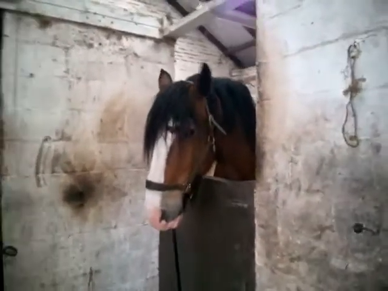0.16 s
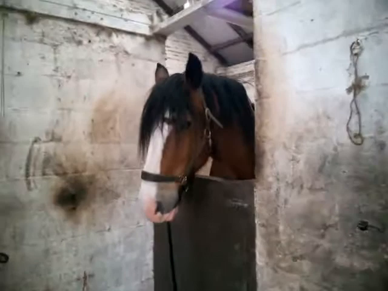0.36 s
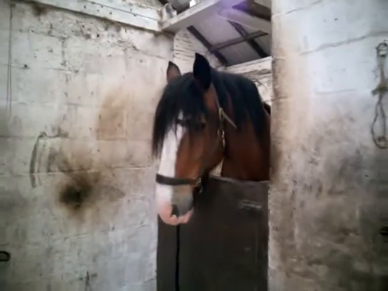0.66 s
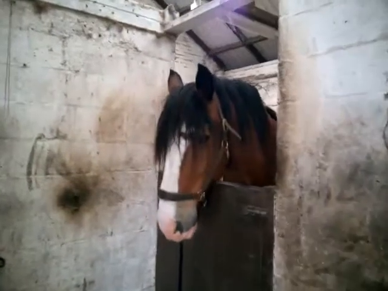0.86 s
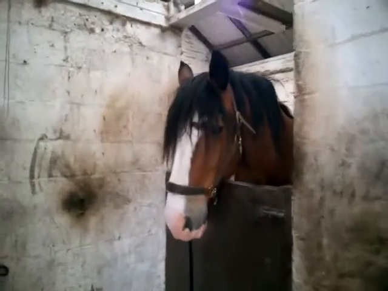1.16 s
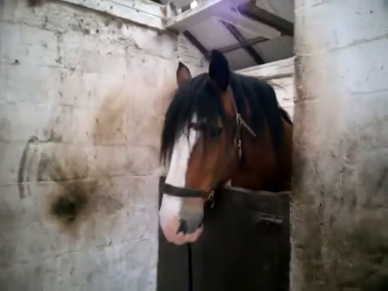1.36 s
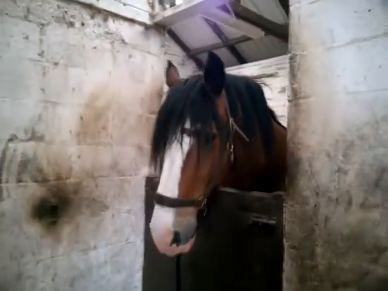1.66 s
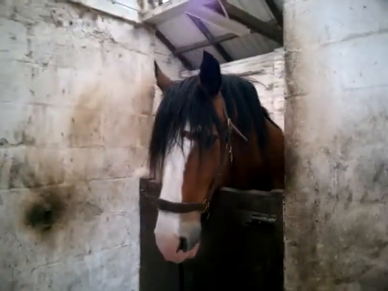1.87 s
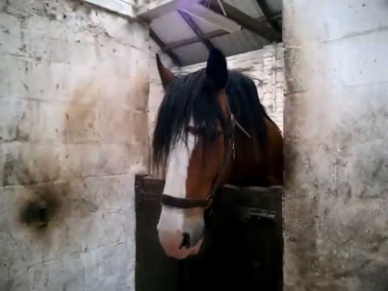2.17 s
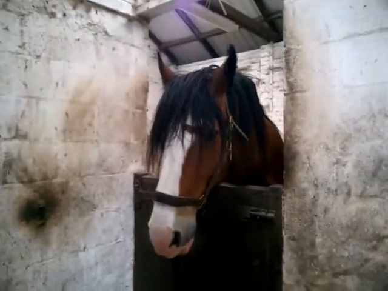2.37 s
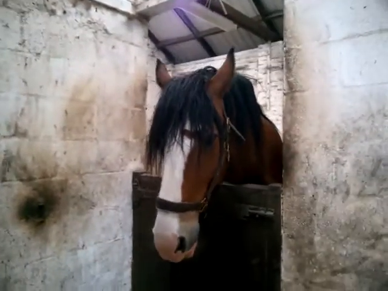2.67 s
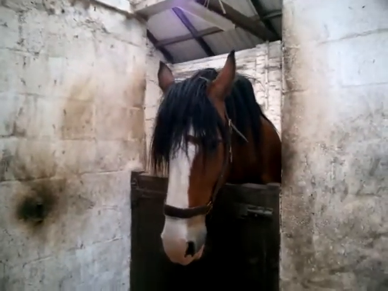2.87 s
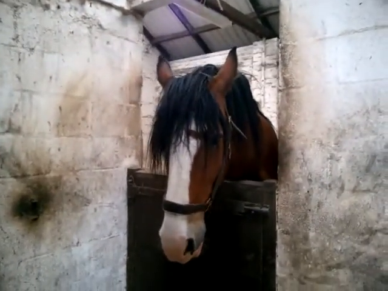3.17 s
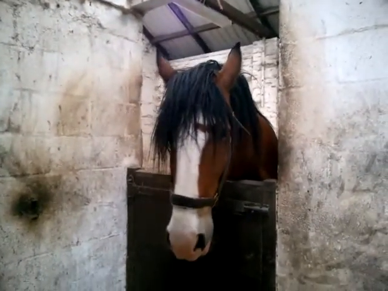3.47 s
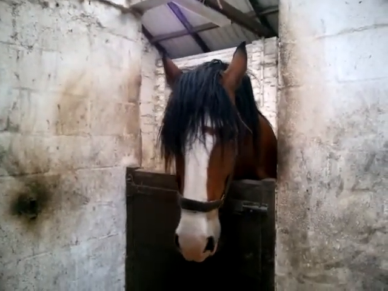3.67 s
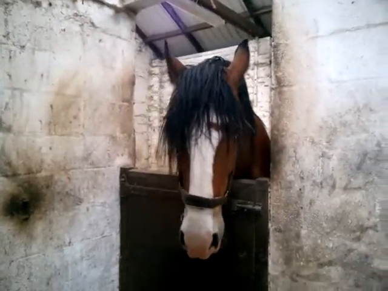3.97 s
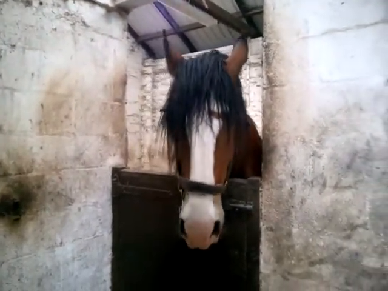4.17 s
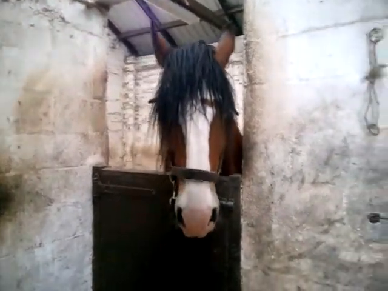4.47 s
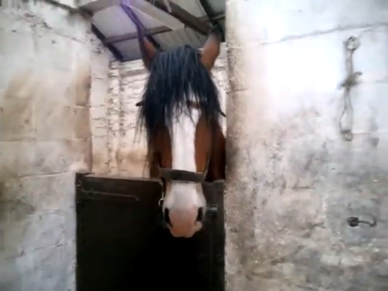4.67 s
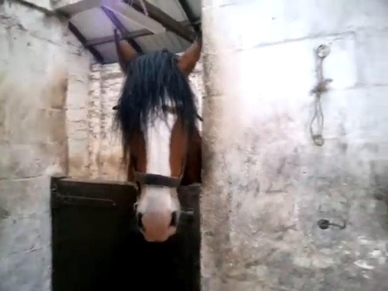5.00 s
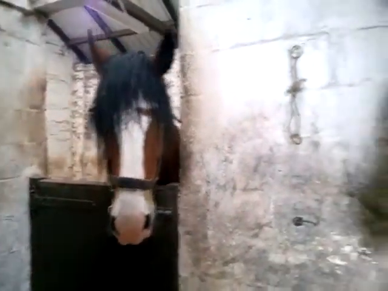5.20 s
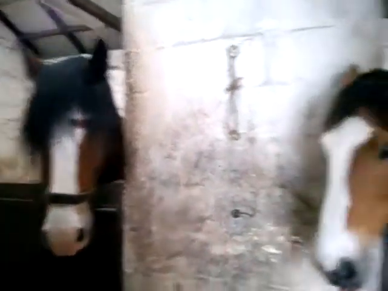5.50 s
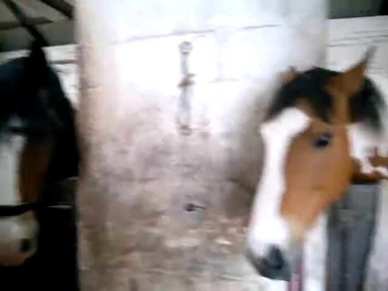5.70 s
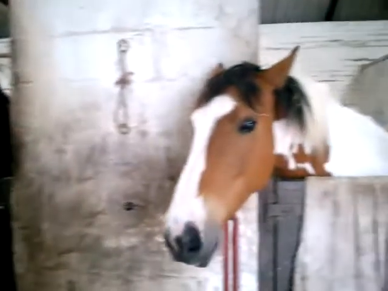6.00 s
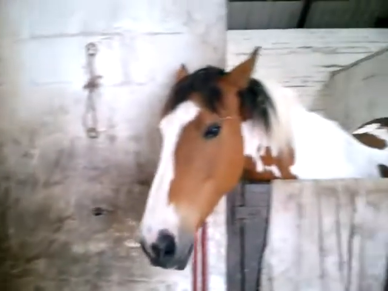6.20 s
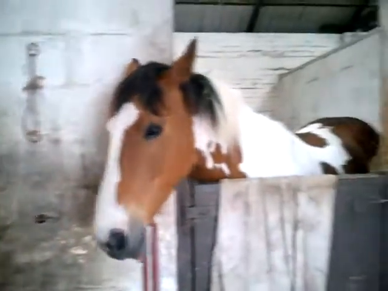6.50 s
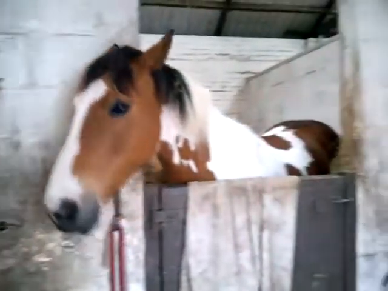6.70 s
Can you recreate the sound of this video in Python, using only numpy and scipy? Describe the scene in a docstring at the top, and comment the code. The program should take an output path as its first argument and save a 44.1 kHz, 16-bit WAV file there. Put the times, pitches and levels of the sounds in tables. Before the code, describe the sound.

A hard-walled stable block with quiet low outdoor rumble, heard through a small carried camera that bumps faintly and mutes soft hiss. The tail of a dull boom from a door further along opens it, with a light hoof scuff; the far door thuds again at 0.7 s. Then a nearer wooden half-door is kicked at 1.4 and 2.2 s, deep and woody, with a gritty straw scuff at 1.6. A soft sniff runs from 1.5 to 2.3 s with a thin airy whistle near 1.9, then a gentle blow until 3.5. At 3.0 s comes the hardest kick: sharp crack, big boom, rattling boards and echo. More kicks follow at 3.9, 4.7 and 5.6 s, the last with a bright bolt ring. Steel clinks just after each of these four, clearest at 5.7. From 6.2 s, only a very faint far knock, low scuffs and fading echoes.

```python
"""Horse kicking a stable door

A horse kicks its wooden half-door again and again in a hard-walled stable block; another bangs a door further along.
Each kick booms as ringing boards, cracks and chatters as noise, and rings the steel bolt; the bolt clinks back.
Hooves scuff the bedding as gritty noise; the horse sniffs and blows as noise through its nostrils, with whistles.
Outdoor air rumbles, a small carried camera bumps and turns down quiet treble, and fading noise makes the echoes."""
import sys
import numpy as np
from scipy import signal
from scipy.fft import rfft, irfft, next_fast_len
from scipy.io import wavfile
from scipy.ndimage import uniform_filter1d

SR = 44100
rng = np.random.default_rng(int(sys.argv[2]) if len(sys.argv) > 2 else 0)


def file_out(sig):
    """Save sig as 16-bit WAV at sys.argv[1]."""
    # one column per channel
    cols = np.atleast_2d(sig).T
    # limit, then scale
    lim = np.clip(cols, -1, 1)
    pcm = np.round(lim * 32767).astype(np.int16)
    wavfile.write(sys.argv[1], SR, pcm)


N = 302085
T = np.arange(N) / SR  # time in the scene, s
AGE = T[:49152]  # time since one event began, s

# colour of the outdoor air: f/Hz, level per Hz/dB
AIR_COLOUR = [(25, -2.5), (60, 0.5), (150, -13.5), (300, -23), (550, -34), (950, -24), (1400, -26),
              (3000, -29.5), (11000, -33.5), (16000, -44.5)]
# dull bumps as the camera is carried: t/s, level/dB
BUMPS = [(0, -44.5), (.24, -49), (1.72, -49), (2.092, -53), (6.16, -46)]
# colour of those bumps: f/Hz, level per Hz/dB
BUMP_COLOUR = [(15, -13), (40, 1), (90, -8), (200, -22.5), (600, -24), (3000, -90)]
# how long the stable block echoes: f/Hz, t60/s (time to fade by 60 dB)
ROOM_T60 = [(60, 1.28), (250, 1.0), (800, 1.16), (2000, 0.95), (5000, 0.9249), (12000, 0.84)]
# colour of the echo: f/Hz, level/dB
ROOM_COLOUR = [(50, -0.5), (200, 2), (1000, 2.5), (3000, -6), (7000, -7), (14000, -18.5)]
# standing waves between the stall walls, set going by the near door: f/Hz, level/dB, t60/s
STALL_MODES = [(114, -13, .45), (124, -19, .5), (180, -11, .6), (203, -17, .5), (239, -14, .5),
               (265, -11.5, .55), (304, -16, .55), (415, -13.5, .55), (455, -19, .5), (517, -20, .5),
               (552, -19, .5), (600, -20, .5), (674, -21, .5), (1156, -20, .5)]
# hooves dragged through bedding: middle t/s, spread to each side/s, floor rumble/dB, straw hiss/dB
SCUFFS = [(.13, .07, -56, -72), (.378, .05, -54, -54.5), (1.628, .028, -51.5, -45.5),
          (2.545, .04, -41, -57), (4.235, .055, -50, -54), (5.081, .05, -56.5, -61), (6.19, .025, -49, -57),
          (6.311, .065, -59, -61), (6.53, .06, -49, -54.5), (6.575, .03, -44, -68)]
# colour of hoof on floor: f/Hz, level per Hz/dB
RUMBLE_COLOUR = [(30, -14), (90, -7), (180, -9), (320, -3), (520, -1), (800, -6), (1200, -13.5),
                 (2500, -28), (6000, -45.5), (16000, -73)]
# colour of rustling straw, also of the bolt's tick: f/Hz, level per Hz/dB
STRAW_COLOUR = [(100, -12), (1200, 10.5), (2200, 2), (3500, 0.5), (5500, -3.5), (10000, -3), (13000, -14),
                (16000, -27)]
# one breath in: start t/s, length/s, flow level/dB, attack/s, release/s, sag/(dB per s)
SNIFF = (1.45, .86, -50.5, .3, .09, 6)
# one breath out: start t/s, length/s, flow level/dB, attack/s, release/s, sag/(dB per s)
BLOW = (2.3, 1.24, -47.5, .33, .13, 4.5)
# nostril resonances breathing in: f/Hz, width/Hz, level/dB
SNIFF_MODES = [(260, 300, 6), (900, 450, -1), (2200, 1000, -2.5), (3600, 1900, -14), (8800, 5000, -16)]
# nostril resonances breathing out: f/Hz, width/Hz, level/dB
BLOW_MODES = [(380, 350, 8), (880, 1400, -3), (1982, 1600, -10), (3200, 950, -3.2), (7800, 2800, -19),
              (10500, 5000, -11.5)]
# whistles of the narrowed nostril: middle t/s, spread to each side/s, level/dB, f/Hz, glide/(octaves per s)
WHISTLES = [(1.915, .045, -59, 6000, -2.6), (2.44, .055, -66, 4800, .8)]
# bolt dropping back: t/s, level/dB
CLINKS = [(3.067, -42.5), (3.951, -43), (4.704, -49), (5.662, -35)]
# steel bolt: f/Hz, level when the door slams on it/dB, level when it drops back/dB, t60/s
BOLT = [(5488, -20, -5.5, .38), (6779, -15, -14, .25), (7314, -1.5, -9, .15), (8387, -25, -8, .14),
        (9380, -18, -24, .13), (10525, -7, -24, .12), (12560, -20, -10, .13), (13243, -6, -32, .13),
        (13927, -4.5, -32, .11)]
# boards of the near door: f/Hz, level/dB, t60/s
NEAR_DOOR = [(40, -11, .42), (78, -7, .22), (109, .5, .18), (152, -15, .1), (178, -8, .1), (235, -4, .05),
             (264.7, -1.5, .13), (295, -2, .1), (416, -6.5, .09), (461.5, -10, .094), (509, -11, .14),
             (674, -21, .2), (754, -22, .2), (1160, -13.5, .35), (1286, -20.5, .22), (1495, -11, .2),
             (1650, -17, .17), (1835, -20, .2)]
# boards of a door further along the block: f/Hz, level/dB, t60/s
FAR_DOOR = [(40, -8, .5), (80, -7, .3), (110, -2, .3), (167, -4, .35), (222, -3, .7), (269, -1, .35),
            (371, -13, .15), (476, -12, .15), (535, -10, .15), (751, -17, .15)]
# colour of the hoof's crack: f/Hz, level per Hz/dB
CRACK_COLOUR = [(30, -6), (100, -10.5), (300, -4.5), (480, -1), (750, -6.5), (1500, 3), (2300, -3.5),
                (3500, -16), (6000, -21.5), (11000, -25.5), (16000, -27)]
# colour of the door's chatter: f/Hz, level per Hz/dB
RATTLE_COLOUR = [(40, -6.5), (150, -5), (450, 2.5), (850, -7), (1600, -4), (2600, -7.5), (4200, -10.5),
                 (6500, -19.5), (11000, -16), (16000, -26.5)]
# hoof on door: t/s, which door, boom/dB, crack/dB, wait until the door meets its bolt/s, rattle/dB,
# rattle length/s, bolt ring/dB, bolt brightness/(dB per octave), room/dB
KICKS = [(-.06, "far", -31, -60, .02, -35, .022, -89, 0, -6),
         (.704, "far", -34, -36, .016, -36.8, .036, -74, -8, 9.5),
         (1.3925, "near", -26, -33, .013, -32.7, .032, -52, -3, 3.5),
         (2.2105, "near", -23.5, -33, .005, -37.5, .021, -62, -10, -2),
         (2.977, "near", -17, -10.8, .016, -20.3, .027, -36, 11, -2),
         (3.853, "near", -23, -23, .013, -25.8, .04, -37, -1, 2),
         (4.6695, "near", -21.5, -24.5, .012, -32, .03, -47.5, 1.5, 4.5),
         (5.554, "near", -22, -26.5, .015, -23, .026, -26.5, -9, 2),
         (6.156, "far", -50, -45, .026, -53.5, .08, -75, 0, 3)]


def undb(db):
    """Decibels to gain."""
    return 10 ** (np.asarray(db) / 20)


def unit(x):
    """Scale to rms 1."""
    return x / np.sqrt(np.mean(x ** 2))


def at(points, hz):
    """Read a table between its points, with frequency on a log axis."""
    f, value = np.transpose(points)
    return np.interp(np.log(np.maximum(hz, 1)), np.log(f), value)


def colour(x, points):
    """Filter with the given spectrum and unit power gain; it never responds before its input."""
    size = 4096
    hz = np.arange(size // 2 + 1) * SR / size
    # folding the cepstrum (transform of the log spectrum) puts the response after time zero
    cepstrum = irfft(np.log(undb(at(points, hz))))
    cepstrum[1:size // 2] *= 2
    cepstrum[size // 2 + 1:] = 0
    response = irfft(np.exp(rfft(cepstrum)))
    return signal.fftconvolve(x, response / np.linalg.norm(response))[:len(x)]


def soften(x, hz, order=2):
    """Low-pass: takes away treble above hz, as a padded contact does."""
    low_pass = signal.butter(order, min(hz, SR * .45), fs=SR, output="sos")
    return signal.sosfilt(low_pass, x)


def fade(t60):
    """Free decay: falls by 60 dB in t60 seconds."""
    return np.exp(-np.log(1000) * AGE / t60)


def ring(modes):
    """One blow sets every mode (Hz, dB, t60) going as a fading sine."""
    return sum(undb(db) * fade(t60) * np.sin(2 * np.pi * hz * AGE) for hz, db, t60 in modes)


def boards(modes, sway_hz=160):
    """A door's modes; in the low ones the whole leaf sways against the struck board."""
    high = ring([m for m in modes if m[0] >= sway_hz])
    low = ring([m for m in modes if m[0] < sway_hz])
    return high - low


def walk(rate):
    """Random wander: a new random height, rate times a second, joined by straight lines."""
    knots = rng.standard_normal(256)
    return np.interp(T * rate, np.arange(len(knots)), knots)


def swell(middle_s, spread_s):
    """A level that rises and falls once, along a bell curve."""
    return np.exp(-.5 * ((T - middle_s) / spread_s) ** 2)


def add(out, s, x):
    """Mix x in from time s on."""
    start = int(s * SR)
    x, start = x[max(-start, 0):], max(start, 0)
    out[start:start + len(x)] += x[:N - start]


def air(level_db=-62.5, wander_db=1.5):
    """Outdoor air: coloured noise, mostly low, whose level wanders."""
    return colour(rng.standard_normal(N), AIR_COLOUR) * undb(level_db + wander_db * walk(4.8))


def bumps(t60=0.76):
    """Low thuds through the camera body: fading bursts of dull noise."""
    out = np.zeros(N)
    for s, db in BUMPS:
        add(out, s, undb(db) * rng.standard_normal(len(AGE)) * fade(t60))
    return colour(out, BUMP_COLOUR)


def stall_echo(gap_s=0.003, build_s=0.022, early_db=4, early_t60=0.41):
    """Response of the block: quick reflections in the stall, then a long tail that loses its treble."""
    hz, age, bins = signal.stft(rng.standard_normal(len(AGE)), SR, nperseg=512)
    tail_decay = undb(-60 * age / at(ROOM_T60, hz)[:, None])
    early_decay = undb(early_db - 60 * age / early_t60)
    decay = tail_decay + early_decay
    # level each band by its energy, then colour it
    decay *= undb(at(ROOM_COLOUR, hz))[:, None] / np.linalg.norm(decay, axis=1, keepdims=True)
    tail = signal.istft(bins * decay, SR)[1][:len(AGE)] * np.sqrt(len(age) / len(AGE))
    return np.sqrt(2) * tail * np.clip((AGE - gap_s) / build_s, 0, 1)


def echo(x, room):
    """What the walls send back."""
    return signal.fftconvolve(x, room)[:len(x)]


def with_walls(contacts, room):
    """Short contacts and their echo; each wall hears them differently, so the echo keeps only their energy."""
    return contacts + np.linalg.norm(contacts) * room


def standing_waves(build_s=.025):
    """The air in the stall follows the boards and takes a few crossings to start ringing."""
    return boards(STALL_MODES) * (1 - np.exp(-AGE / build_s))


def scuffs(room, grain_db=3, direct_db=-6, hiss_room_db=-10):
    """A hoof grinds over the floor behind the door while the straw rustles: two layers of gritty noise."""
    swells = [(swell(s, spread_s), low_db, high_db) for s, spread_s, low_db, high_db in SCUFFS]
    # a random gain on every sample makes the noise grainy; both layers share the grains
    grains = undb(grain_db * np.minimum(rng.exponential(size=N), 4))
    floor_grit, straw_grit = unit(rng.standard_normal((2, N)) * grains)
    floor_level = sum(drag * undb(db) for drag, db, _ in swells)
    straw_level = sum(drag * undb(db) for drag, _, db in swells)
    rumble = colour(floor_grit * floor_level, RUMBLE_COLOUR)
    straw = colour(straw_grit * straw_level, STRAW_COLOUR)
    return undb(direct_db) * rumble + straw + echo(rumble + undb(hiss_room_db) * straw, room)


def breath(start_s, length_s, db, attack_s, release_s, sag_db_per_s):
    """Air flow of one breath: it builds, sags slowly and stops."""
    age = T - start_s
    gate = np.clip(age / attack_s, 0, 1) * np.clip((length_s - age) / release_s, 0, 1)
    return gate * undb(db - sag_db_per_s * np.clip(age - attack_s, 0, length_s))


def nostrils(flow, modes, top_hz, flutter_db=1):
    """Turbulent air rings the horse's nasal passages: noise shaped by resonances, fluttering a little."""
    size = next_fast_len(N)
    hz = np.arange(1, size // 2 + 2) * SR / size
    gain = sum(undb(db) / (1 + ((hz - f * f / hz) / width) ** 2) for f, width, db in modes)
    turbulence = irfft(rfft(rng.standard_normal(size)) * gain)[:N]
    return unit(soften(turbulence, top_hz, order=3)) * flow * undb(flutter_db * walk(28))


def whistle(middle_s, spread_s, db, hz, glide, width_hz=550):
    """A narrow, airy tone that slides as the nostril changes shape."""
    wobble = soften(rng.standard_normal(N), width_hz)
    pitch = hz * 2 ** (glide * np.clip(T - middle_s, -.5, .5))
    tone = np.cos(2 * np.pi * np.cumsum(pitch) / SR)
    return unit(wobble * tone) * undb(db) * swell(middle_s, spread_s)


def muzzle(sniff_dip=.35):
    """The horse breathes in and out, with thin whistles as a breath gathers."""
    # the sniff hisses less while the narrowed nostril whistles
    sniff = breath(*SNIFF) * (1 - sniff_dip * swell(*WHISTLES[0][:2]))
    breath_in = nostrils(sniff, SNIFF_MODES, top_hz=10500)
    breath_out = nostrils(breath(*BLOW), BLOW_MODES, top_hz=13000)
    return breath_in + breath_out + sum(whistle(*row) for row in WHISTLES)


def clinks(tick_db=1, tick_t60=0.06):
    """The door swings back and the bolt drops in its keeper: ringing steel with a short noisy tick."""
    out = np.zeros(N)
    steel = ring([(hz, db, t60) for hz, _, db, t60 in BOLT])
    for s, db in CLINKS:
        tick = colour(rng.standard_normal(len(AGE)) * fade(tick_t60), STRAW_COLOUR)
        add(out, s, undb(db) * (steel + undb(tick_db) * tick))
    return out


def rattle(length_s, spread_db=4, tail_t60=0.064):
    """The door chatters on bolt and hinges: uneven contacts that swell and die."""
    hold = 96  # samples that share one random level
    levels_db = spread_db * np.clip(rng.standard_normal(len(AGE) // hold), -2, 1)
    contacts = rng.standard_normal(len(AGE)) * np.repeat(undb(levels_db), hold)
    build = np.minimum(0.68 + 2 * AGE / length_s, 1)
    # the chatter starts to die halfway through its length
    tail = np.minimum(np.exp(-np.log(1000) * (AGE - length_s / 2) / tail_t60), 1)
    return unit(contacts) * build * tail


def door(flex_db=5, flex_t60=0.079, hoof_hz=1000, crack_t60=0.0049, splinter_db=-15, splinter_t60=0.34,
         bolt_room_db=-12, bright_hz=14000, full_db=-22, chatter_room_db=0, boom_room_db=-4.0):
    """Hoof cracks on the boards, they boom, and the door slams into its bolt a moment later."""
    out = np.zeros(N)
    # the first wide swings of the loose door are damped quickly
    flex = (1 + undb(flex_db) * fade(flex_t60)) / (1 + undb(flex_db))
    swings = {"near": flex * boards(NEAR_DOOR), "far": flex * boards(FAR_DOOR)}
    for s, which, boom_db, crack_db, slack_s, rattle_db, length_s, bolt_db, tilt_db, room_db in KICKS:
        # the camera moves, so every kick finds other reflections
        room = undb(room_db) * stall_echo()
        # hoof_hz and bright_hz hold for a blow at full_db; weaker ones are duller
        crack_force = undb((crack_db - full_db) / 3)
        slam_force = undb((rattle_db - full_db) / 3)

        # a softer hoof contact lasts longer and wakes mainly the low modes
        boom = soften(swings[which], hoof_hz * crack_force)
        boom = boom + undb(boom_room_db) * echo(boom, room)
        if which == "near":
            boom = boom + undb(room_db) * standing_waves()

        contact_level = fade(crack_t60) + undb(splinter_db) * fade(splinter_t60)
        contact = rng.standard_normal(len(AGE)) * contact_level
        crack = colour(with_walls(contact, room), CRACK_COLOUR)
        crack = soften(crack, bright_hz * crack_force, order=1)
        add(out, s, undb(boom_db) * boom + undb(crack_db) * crack)

        slam = colour(with_walls(rattle(length_s), undb(chatter_room_db) * room), RATTLE_COLOUR)
        slam = soften(slam, bright_hz * slam_force, order=2)
        # where the bolt is caught decides how strongly its high modes ring; the tilt starts at its third mode
        steel = ring([(hz, db + tilt_db * np.log2(max(hz / BOLT[2][0], 1)), t60) for hz, db, _, t60 in BOLT])
        steel = steel + undb(bolt_room_db) * echo(steel, room)
        add(out, s + slack_s, undb(rattle_db) * slam + undb(bolt_db) * steel)
    return out


def scene():
    """Doors, hooves and muzzle in the stable block, over a low rumble of outdoor air."""
    room = stall_echo()
    breaths = muzzle()
    steel = clinks()
    near_echo = echo(undb(-6) * breaths + undb(-8) * steel, room)
    mix = air() + bumps() + scuffs(room) + breaths + steel + near_echo + door()
    return mix[None]


def suppress(x, threshold_db=-80, depth_db=-10, from_hz=1500):
    """Noise suppressor: treble bands under a threshold are turned down, which cuts the echoes short."""
    hz, _, bins = signal.stft(x, SR, nperseg=512)
    # average the power over neighbouring bands, then over neighbouring moments
    power = uniform_filter1d(abs(bins) ** 2, size=13, axis=-2)
    power = uniform_filter1d(power, size=3, axis=-1)
    # the threshold, threshold_db at twice from_hz, falls towards the treble, as background noise does
    limit = undb(threshold_db) ** 2 * (2 * from_hz / np.maximum(hz, from_hz))[:, None] ** 2
    closed = 1 / (1 + (np.maximum(power, 0) / limit) ** 2)
    # no effect below half of from_hz, full effect above from_hz
    treble = np.clip(2 * hz / from_hz - 1, 0, 1)[:, None] ** 2
    return signal.istft(bins * undb(depth_db * closed * treble), SR)[1][:, :N]


def record(dry):
    """The camera suppresses quiet hiss and cuts the top."""
    top_cut = signal.ellip(10, .2, 80, 15850, fs=SR, output="sos")  # steep low-pass at 15850 Hz
    return signal.sosfilt(top_cut, suppress(dry))


dry = scene()
out = record(dry)
file_out(out)
```